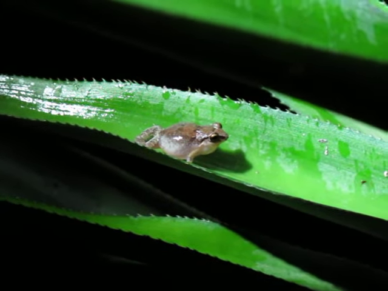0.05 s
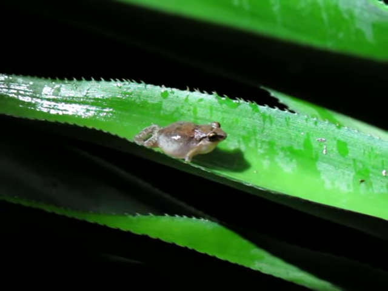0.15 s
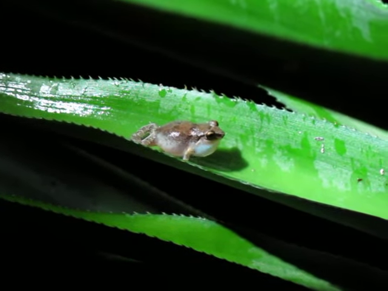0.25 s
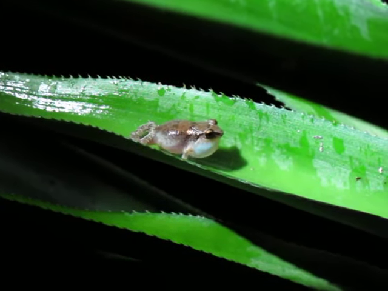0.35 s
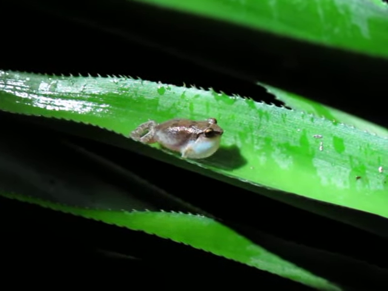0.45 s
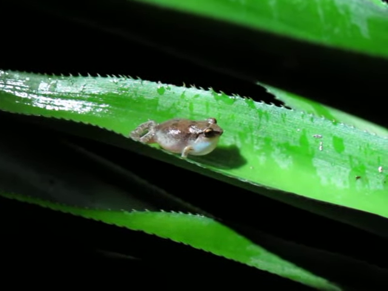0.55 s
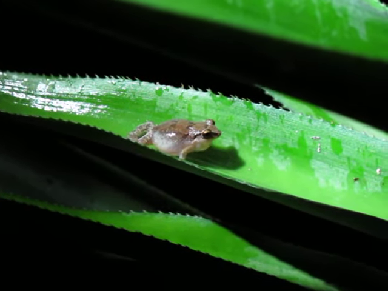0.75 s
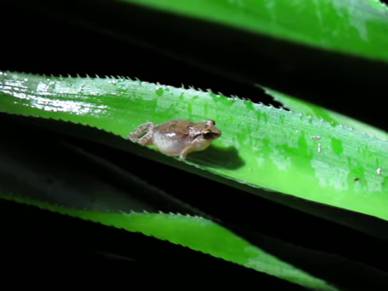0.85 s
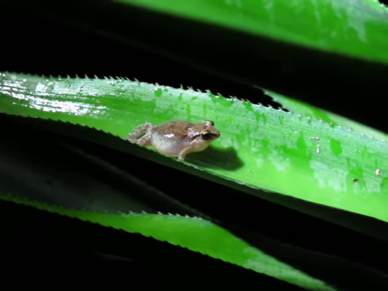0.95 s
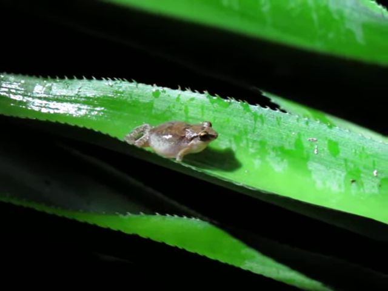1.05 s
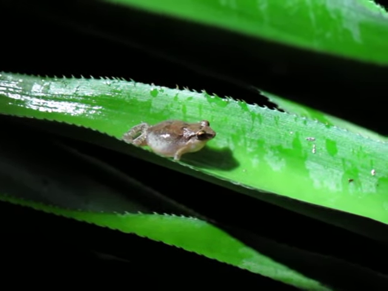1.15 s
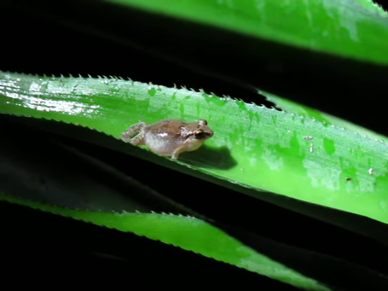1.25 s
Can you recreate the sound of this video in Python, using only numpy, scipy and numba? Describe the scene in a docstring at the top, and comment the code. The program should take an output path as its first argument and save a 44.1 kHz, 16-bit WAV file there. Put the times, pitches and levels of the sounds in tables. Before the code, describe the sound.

A tiny frog calls once up close, a short low note jumping to a loud, higher whistle. Behind it, high insect buzzing and a distant frog chorus carry on through the forest at night.

```python
"""A forest at night. Four insects buzz with their wing strokes, and a chorus of tree frogs rings through
the leaves over a bed of distant insect din, air and faint hum. Up close, one tiny frog on a leaf gives
a two-note call with its vocal sac: a low pure note that breaks into a higher, swelling whistle.
A limiter holds the whistle down, so the background ducks and comes back. Late on, another insect
adds two faint, high rustles."""
import sys
import numpy as np
from scipy import signal
from scipy.fft import rfft, irfft
from scipy.io import wavfile
from scipy.ndimage import uniform_filter1d
from numba import njit

SR = 44100
rng = np.random.default_rng(int(sys.argv[2]) if len(sys.argv) > 2 else 0)


def materialize(psi):
    """Save the field psi as 16-bit PCM at rate SR to the path in sys.argv[1].

    A 1-D psi becomes a single channel; in a 2-D psi each row is a channel.
    """
    bounded = np.clip(np.atleast_2d(psi).T, -1, 1)
    quanta = np.round(bounded * 32767).astype(np.int16)
    wavfile.write(sys.argv[1], SR, quanta)


N = 57330

# The four buzzing insects. Each row: strokes per second, wing ring in Hz, sweep to either side in Hz,
# sharpness of the stroke, strength of the return stroke.
INSECT_WINGS = [(137.2, 6976, 190, 1.8, .3), (134.4, 7272, 230, 1.6, .3), (135.2, 7250, 200, 1.4, .25),
                (137.5, 8479, 70, .3, .1)]
# Their fader moves. Each row: time in seconds, then a level in dB for each of the four.
INSECT_FADERS = [(0, -38.5, -35, -56, -65), (.12, -35, -33.5, -50, -71), (.27, -37.5, -41, -34.5, -68),
                 (.4, -35.5, -40.5, -48, -61), (.6, -34.5, -37, -40, -59.5), (.69, -33.5, -37, -40.5, -70),
                 (.9, -35.5, -55, -34, -60), (1.1, -39, -52, -37.5, -65), (1.3, -36.5, -45, -38.5, -65)]
# Neighbouring frogs. Each row: start in seconds, length in seconds, pitch in Hz, level in dB.
NEIGHBOUR_NOTES = [(-.03, 0.36, 3193, -44.5), (-.03, 0.11, 3690, -35.5), (.03, 0.1, 2000, -44.5),
                   (.44, 0.14, 3345, -46.5), (.52, 0.085, 1975, -43), (.68, 0.26, 3520, -48),
                   (.74, 0.082, 1890, -50.5), (.86, 0.18, 3327, -38), (.89, 0.069, 2110, -51),
                   (.95, 0.2, 3790, -47), (1.03, 0.096, 3826, -40.5), (1.12, 0.071, 1990, -46.5),
                   (1.195, 0.02, 3230, -42), (1.225, 0.048, 3535, -35)]
# The far frog chorus. Each row: lowest and highest pitch in Hz, note length in seconds,
# notes per second, level in dB.
CHORUS_BANDS = [(1875, 2080, .045, 78, -53.5), (2014, 2230, 0.038, 56, -61), (3380, 3920, .11, 55, -47)]
# Tone of the distant insect din. Each row: frequency in Hz, relative level in dB.
DIN_SPECTRUM = [(2900, -33.5), (3300, -4), (3700, -3), (4200, -16), (4480, -7), (4780, 0), (5050, -2.5),
                (5450, -15), (5800, -5.5), (6250, -18), (6700, -0.5), (7350, -5), (7900, -19), (9000, -39)]
# Tone of the night air and microphone hiss. Each row: frequency in Hz, relative level in dB.
AIR_SPECTRUM = [(20, 2.5), (45, 3.5), (130, -8.5), (350, -10.5), (700, -17), (1400, -25), (2600, -24),
                (8000, -22.5), (10800, -20), (13000, -25.5), (15500, -41)]
# The close frog's two notes. Each row: time in seconds, pitch in Hz, level in dB.
LOW_NOTE_CURVE = [(.2205, 1800, -44), (.2245, 1880, -22), (.2265, 1932, -13.5), (.231, 1933, -10.8),
                  (.255, 1934, -11), (.275, 1937, -11.8), (.281, 2000, -14.5), (.284, 2050, -28),
                  (.29, 1980, -29.5), (.297, 1975, -40), (.312, 1970, -56)]
WHISTLE_CURVE = [(.282, 3000, -28), (.2845, 3140, -12), (.29, 3365, -12), (.297, 3478, -10.8),
                 (.302, 3500, -9.5), (.309, 3522, -8.7), (.318, 3538, -6.9), (.346, 3560, -6.2),
                 (.376, 3559, -5.3), (.425, 3526, -4.7), (.438, 3514, -6.2), (.443, 3552, -6.3),
                 (.451, 3525, -18), (.459, 3540, -21.5), (.467, 3530, -50)]
# Their overtones. Each row: harmonic number, level in dB against the fundamental at the note's peak.
LOW_NOTE_HARMONICS = [(2, -20.5), (3, -24), (5, -30)]
WHISTLE_HARMONICS = [(2, -55), (3, -45)]
# Squeaks where the voice breaks. Each row: centre in seconds, length in seconds, pitch in Hz,
# level in dB, roughness as phase wobble in radians.
VOICE_BREAKS = [(0.28, 0.017, 4000, -19, 0.4), (.281, 0.013, 2800, -28, 0.42), (.285, .014, 5150, -32, 1),
                (0.46, 0.025, 4140, -24.5, 0.055)]
# Another insect's rustling chirps. Each row: centre in seconds, length in seconds, level in dB.
RUSTLE_CHIRPS = [(.74, 0.091, -59.5), (0.961, 0.18, -50)]
# Their tone. Each row: frequency in Hz, relative level in dB.
RUSTLE_SPECTRUM = [(8000, -30), (8900, -1), (9400, 3), (10200, -7), (12000, -11), (14500, -35)]

INSECT_FLUTTER_DB, INSECT_WANDER_HZ, INSECT_RASP_RAD, STROKE_CLICK = 0.3, 3, 0.15, 0.24
FOREST_T60_S, INSECT_WET, FROG_WET = 0.35, 0.5, 0.73
SCOOP_SHARE, SCOOP_S = 0.044, 0.016  # the neighbours start flat and slide up to pitch
DIN_DB, AIR_DB, HUM_HZ, HUM_DB = -39.5, -49, 99.7, -52.5
SHIMMER, JITTER = 0.016, 0.00064  # the close frog's waver, as shares of level and pitch
LIMIT_DB, LIMIT_STEP_DB, LIMIT_HOLD_S, RELEASE_DB_PER_S = -9.5, 0.9, 0.16, 28
HIGH_CUT_HZ = 15650


def undb(db):
    """Decibels to gain."""
    return 10 ** (np.asarray(db) / 20)


def level(x, db):
    """Set the rms level."""
    return x * undb(db) / np.sqrt(np.mean(x ** 2) + 1e-18)


def clock():
    """Time of every sample in seconds."""
    return np.arange(N) / SR


def turn(hz):
    """Phase in radians of a moving frequency."""
    return 2 * np.pi * np.cumsum(hz) / SR


def walk(rate):
    """Smooth random wobble with an rms of 1, changing course `rate` times a second."""
    span = max(int(SR / rate), 1)
    steps = rng.standard_normal(N)
    return level(uniform_filter1d(steps[np.arange(N) // span], span), 0)


def noise(spectrum, db):
    """Noise shaped by an EQ curve of (Hz, dB) points."""
    hz, gain_db = np.array(spectrum).T
    bins = np.maximum(np.fft.rfftfreq(N, 1 / SR), 1)
    eq = undb(np.interp(np.log(bins), np.log(hz), gain_db)) * (bins > hz[0] / 2)
    return level(irfft(rfft(rng.standard_normal(N)) * eq, N), db)


def arch(start, length):
    """Half a sine: a smooth fade in and out."""
    return np.sin(np.pi * np.clip((clock() - start) / length, 0, 1))


def forest(x, wet):
    """A short reverb of reflections scattered by leaves and trunks."""
    tail = rng.standard_normal(N) * np.exp(-np.log(1000) * clock() / FOREST_T60_S)
    return x + wet * signal.fftconvolve(x, tail / np.sqrt(np.sum(tail ** 2)))[:N]


def buzzing_insects():
    """Each wing stroke swells and sweeps down through the wing's ring, then returns more softly."""
    times, *faders = np.array(INSECT_FADERS).T
    out = 0
    for (rate, hz, sweep_hz, sharpness, back), db in zip(INSECT_WINGS, faders):
        drift = 1 + INSECT_WANDER_HZ / hz * walk(5)
        stroke = turn(rate * drift) + rng.uniform(0, 2 * np.pi)
        swell = np.exp(sharpness * (np.cos(stroke) - 1)) + back * np.exp(-4 * (np.cos(stroke) + 1))
        click = STROKE_CLICK * np.exp(50 * (np.cos(stroke + 1) - 1))  # just ahead of the swell's peak
        ring = np.sin(turn(hz * drift - sweep_hz * np.sin(stroke)) + INSECT_RASP_RAD * walk(600))
        gain = undb(np.interp(clock(), times, db) + INSECT_FLUTTER_DB * walk(45))
        out += level((swell + click) * ring, 0) * gain
    return forest(out, INSECT_WET)


def far_note(start, length, hz, scoop_hz=0):
    """A distant frog's pure note, sliding up from `scoop_hz` below its pitch."""
    age = np.maximum(clock() - start, 0)
    return arch(start, length) * np.sin(turn(hz - scoop_hz * np.exp(-age / SCOOP_S)))


def frog_chorus():
    """A few neighbours stand out from a far crowd of low notes and whistles."""
    out = sum(undb(db) * far_note(start, length, hz, SCOOP_SHARE * hz)
              for start, length, hz, db in NEIGHBOUR_NOTES)
    for low_hz, high_hz, length, rate, db in CHORUS_BANDS:
        crowd = 0
        for slot, (lag, pitch, strength) in enumerate(rng.random((128, 3))):
            start = (slot + lag) / rate - length
            if start < N / SR:
                crowd += (0.5 + strength) * far_note(start, length, low_hz + pitch * (high_hz - low_hz))
        out += level(crowd, db)
    return forest(out, FROG_WET)


def insect_din():
    """Distant insects blur into bright bands of noise whose level wavers and flickers."""
    return noise(DIN_SPECTRUM, DIN_DB) * undb(walk(15) + 0.85 * walk(250))


def night_air():
    """A bed of moving air, microphone hiss and a faint low hum."""
    hum = level(np.sin(2 * np.pi * HUM_HZ * clock()), HUM_DB)
    return noise(AIR_SPECTRUM, AIR_DB) + hum


def vocal_sac_note(curve, harmonics):
    """One nearly pure note of the vocal sac; its weak overtones fade when it softens."""
    times, hz, db = np.array(curve).T
    t = clock()
    phase = turn(np.interp(t, times, hz) * (1 + JITTER * walk(350)))
    gate = (t > times[0]) * (t < times[-1])
    envelope = undb(np.interp(t, times, db)) * gate * (1 + SHIMMER * walk(250))
    overtones = sum(undb(harmonic_db) * np.sin(k * phase) for k, harmonic_db in harmonics)
    brightness = (envelope / envelope.max()) ** 2
    return envelope * (np.sin(phase) + brightness * overtones)


def close_frog():
    """The low note, the whistle, and brief squeaks as the voice jumps and stops."""
    out = vocal_sac_note(LOW_NOTE_CURVE, LOW_NOTE_HARMONICS)
    out += vocal_sac_note(WHISTLE_CURVE, WHISTLE_HARMONICS)
    for centre, length, hz, db, roughness in VOICE_BREAKS:
        squeak = np.sin(2 * np.pi * hz * clock() + roughness * walk(1200))
        out += undb(db) * arch(centre - length / 2, length) ** 2 * squeak
    return out


def rustling_insect():
    """Faint chirps, each a soft swell of very high noise."""
    envelope = sum(undb(db) * arch(centre - length / 2, length) for centre, length, db in RUSTLE_CHIRPS)
    return noise(RUSTLE_SPECTRUM, 0) * envelope


def scene():
    """A mono mix: the close frog dry and up front, the night forest behind it."""
    mix = close_frog() + buzzing_insects() + frog_chorus() + insect_din() + rustling_insect() + night_air()
    return mix[None]


@njit
def limiter_cut(over_db, step_db, hold_samples, release_db_per_sample):
    """Gain reduction in dB: one small step at each overload, a hold, then a steady release."""
    out = np.zeros(len(over_db))
    cut_db, wait = 0., 0.
    for i in range(len(over_db)):
        wait -= 1
        if over_db[i] > cut_db:
            cut_db += step_db
            wait = hold_samples
        elif wait < 0:
            cut_db = max(cut_db - release_db_per_sample, 0.)
        out[i] = cut_db
    return out


def record(dry):
    """A limiter ducks the whole mix in faintly ticking steps; a steep high cut follows."""
    envelope = uniform_filter1d(np.abs(signal.hilbert(dry[0])), size=64)
    over_db = 20 * np.log10(envelope + 1e-9) - LIMIT_DB
    cut_db = limiter_cut(over_db, LIMIT_STEP_DB, LIMIT_HOLD_S * SR, RELEASE_DB_PER_S / SR)
    high_cut = signal.ellip(10, 0.2, 80, HIGH_CUT_HZ, fs=SR, output="sos")
    return signal.sosfilt(high_cut, dry * undb(-cut_db))


dry = scene()
out = record(dry)
materialize(out)
```